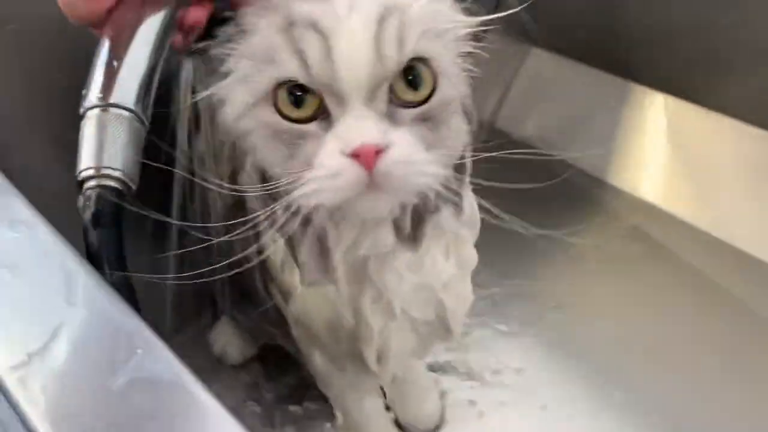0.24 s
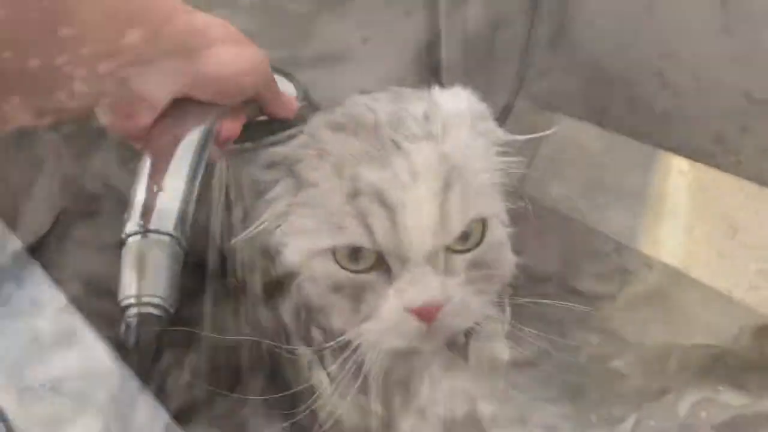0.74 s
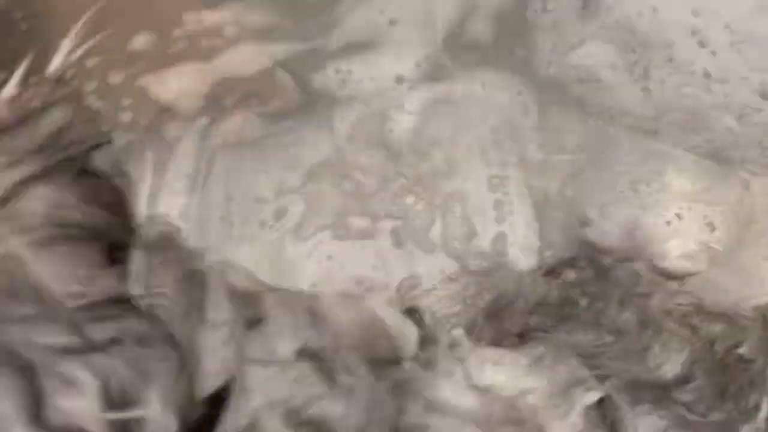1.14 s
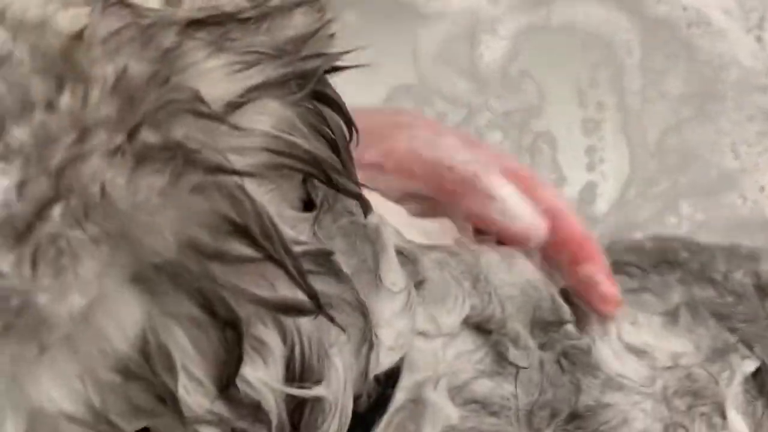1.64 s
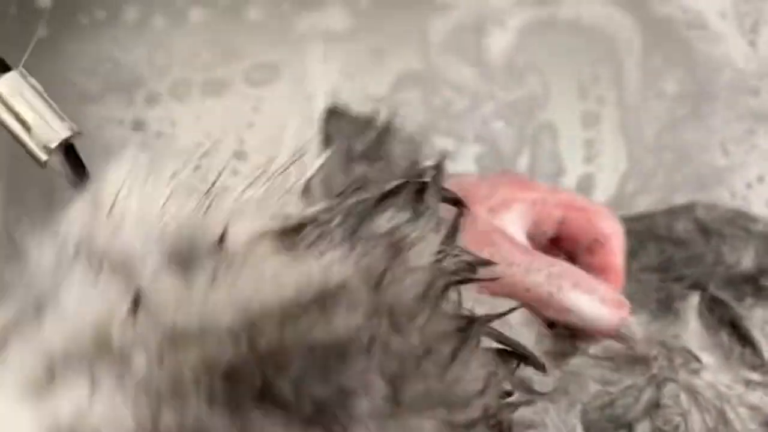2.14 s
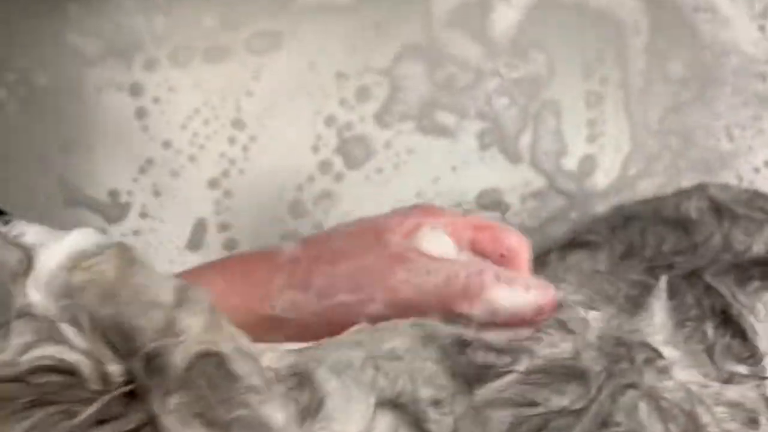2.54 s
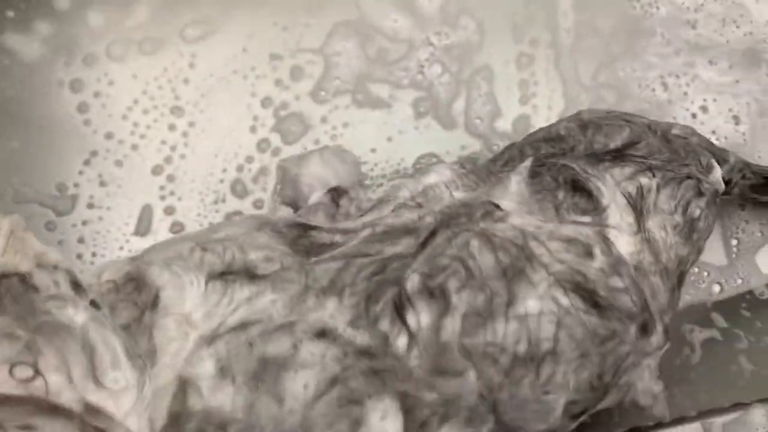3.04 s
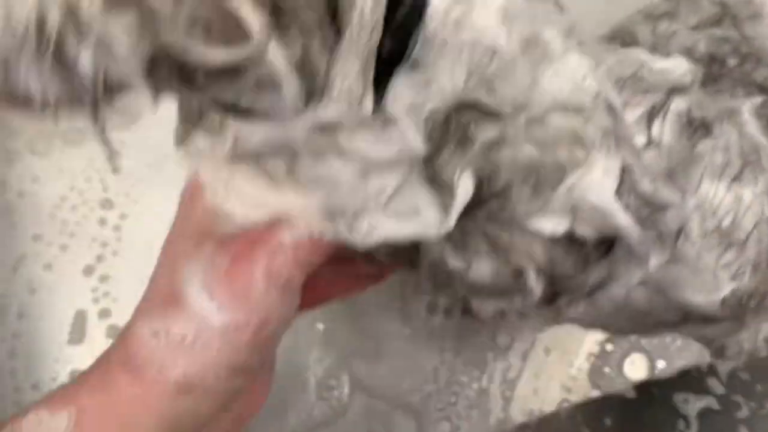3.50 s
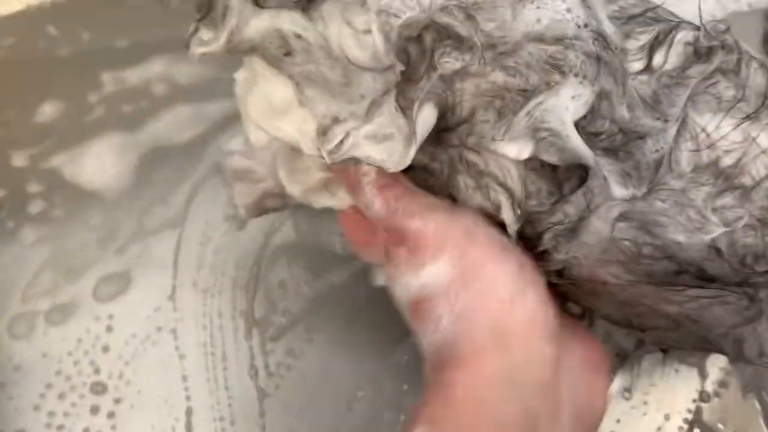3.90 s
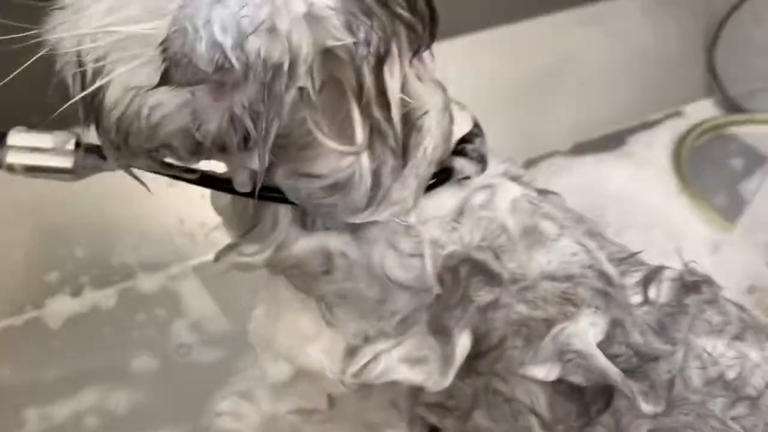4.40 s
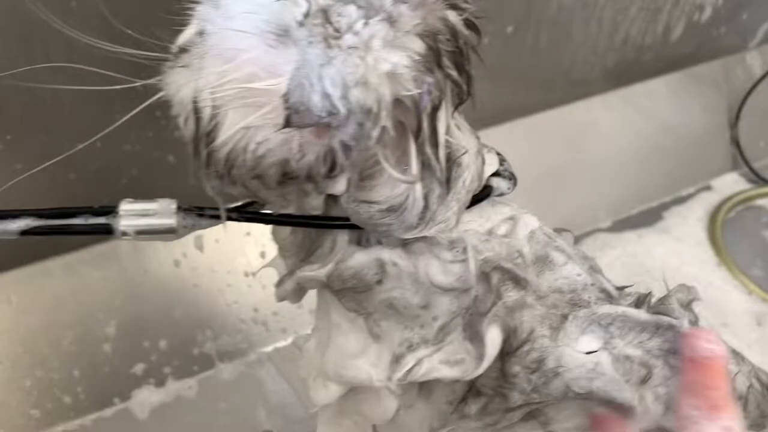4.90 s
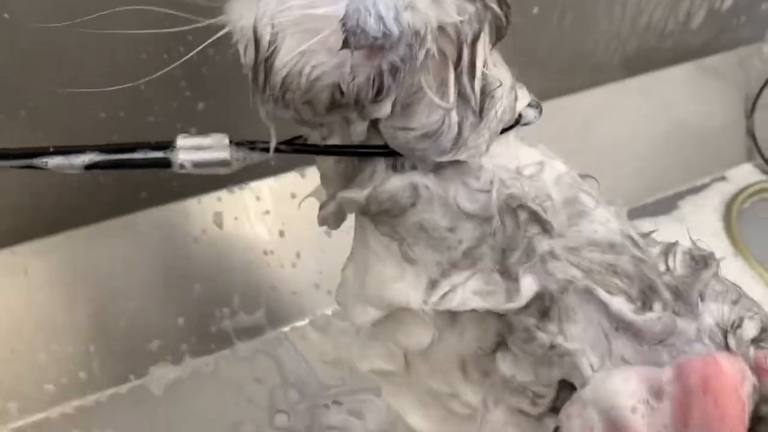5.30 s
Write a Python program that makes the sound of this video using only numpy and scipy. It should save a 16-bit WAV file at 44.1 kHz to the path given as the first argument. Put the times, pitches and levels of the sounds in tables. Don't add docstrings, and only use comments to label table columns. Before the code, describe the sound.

A hand shower sprays wet fur in quick sweeping bursts in a steel tub, then fades into loud, humming blower drone with a few soft thuds.

```python
import sys
import numpy as np
from scipy import signal
from scipy.fft import rfft, irfft, next_fast_len
from scipy.io import wavfile
from scipy.ndimage import uniform_filter1d, map_coordinates

SR = 44100
rng = np.random.default_rng(int(sys.argv[2]) if len(sys.argv) > 2 else 0)


def amplitude_ratio(level_db):
    exponent = np.asarray(level_db, float) / 20
    return 10 ** exponent


def bounce(signal):
    frames = np.transpose(np.atleast_2d(signal))
    limited = np.clip(frames, -1, 1)
    pcm = np.round(limited * 32767).astype(np.int16)
    wavfile.write(sys.argv[1], SR, pcm)


N = 244755
TIME = np.arange(N) / SR
SIDES = np.array([[.5], [-.5]])


def unit(x):
    return x / np.sqrt(np.mean(x ** 2) + 1e-20)


def along(points, hz):
    f, *cols = np.transpose(points)
    return [np.interp(np.log(hz + 1), np.log(f + 1), c) for c in cols]


def curves(rows):
    s, *cols = np.transpose(rows)
    return [np.interp(TIME, s, c) for c in cols]


def wobble(rate):
    steps = np.arange(0, N + 64, 64) / SR
    knots = rng.standard_normal(int(N * rate / SR) + 4)
    return np.interp(TIME, steps, map_coordinates(knots, [steps * rate]))


def swells(rows, rise_db_s, fall_db_s, floor_db):
    s, hold, db = np.transpose(rows)[:, :, None]
    climbing = np.maximum(rise_db_s * (s - TIME), 0)
    sinking = np.maximum(fall_db_s * (TIME - s - hold), 0)
    return np.maximum((db - climbing - sinking).max(axis=0), floor_db)


def filtered(x, response):
    m = next_fast_len(N + SR // 2)
    return irfft(rfft(x, m) * response(np.fft.rfftfreq(m, 1 / SR)), m)[..., :N]


def spectrum_gain(spectrum):
    return lambda f: amplitude_ratio(along(spectrum, f)[0])


def modes(rows, floor_db):
    def gain(f):
        peaks = sum(amplitude_ratio(2 * db) / (1 + (2 * (f - c) / w) ** 4) for c, w, db in rows)
        return np.sqrt(amplitude_ratio(2 * floor_db) + peaks)
    return gain


def band(f, lo_hz, hi_hz):
    return 1 / np.sqrt((1 + (lo_hz / (f + 1)) ** 8) * (1 + (f / hi_hz) ** 4))


def white():
    return rng.standard_normal((2, N))


def patchy(depth_db):
    z = signal.stft(white(), nperseg=512)[2]
    field = uniform_filter1d(rng.standard_normal(z.shape[1:]), size=6, axis=0)
    field = uniform_filter1d(field, size=10, axis=1)
    return signal.istft(z * amplitude_ratio(depth_db * unit(field)), nperseg=512)[1][:, :N]


def drops(rate, spread_db):
    out = np.zeros(2 * N)
    place, sign, size = rng.random((int(2 * rate * N / SR), 3)).T
    out[(place * 2 * N).astype(int)] = (2 * sign - 1) * amplitude_ratio(-spread_db * np.log(size + .01))
    return unit(out.reshape(2, N))


# frequency in Hz, likeness from 0 to 1, left over right in dB, left lead in rad.
PORT_LIKENESS = [(40, .9, 2, .45), (110, .94, 2.5, .55), (190, .98, -1, .9), (225, .9, 0, .6),
                 (255, .6, 2, .8), (300, .88, 4, .9), (350, .95, 4, .55), (560, .8, 3, .7),
                 (800, .25, 4, .5), (1450, .45, 4, -.9), (2100, .25, 3, -.5), (3000, .25, 2, -3),
                 (4200, .25, 4, -5.3), (5500, .3, 2, -7.4)]


def in_room(pair, colour, shift_db=0):
    m = next_fast_len(N + 8192)
    hz = np.fft.rfftfreq(m, 1 / SR)
    alike, pan_db, lead = along(PORT_LIKENESS, hz)
    turn = np.arccos(np.clip(alike, 0, 1)) / 2
    shared, own = rfft(pair, m) * colour(hz)
    tilt = amplitude_ratio((pan_db + shift_db) * SIDES) * np.exp(1j * lead * SIDES)
    mixed = np.cos(turn) * shared + np.sin(turn) * own * 2 * SIDES
    return unit(irfft(tilt * mixed, m)[:, :N])


def direct(pair, spectrum, apart_db):
    lag_s = 1 / 4680
    same = pair[0] + amplitude_ratio(apart_db) * pair[1] * 2 * SIDES
    gain = spectrum_gain(spectrum)
    return unit(filtered(same, lambda hz: gain(hz) * np.exp(-2j * np.pi * hz * lag_s * SIDES)))


# centre in Hz, width in Hz, level in dB.
LOW_ROOM_MODES = [(63.6, 10, -6), (95.6, 28.7, 1), (157.5, 26, -2.5), (185.3, 26.4, 3.5)]
UPPER_ROOM_MODES = [(290.2, 15.5, 2), (317, 63, -4), (376.2, 28, 3), (433, 28.4, 4.5), (470.6, 38, 2),
                    (545, 57, 2.5)]
TOP_ROOM_MODES = [(640, 16, 0), (730, 45, 1)]
# time in seconds, roar in dB, air stream in dB.
FAN_LEVELS = [
    (0, -34, -33),
    (.3, -33.5, -33.5),
    (.8, -38, -38.5),
    (1.35, -31, -38.5),
    (1.85, -31.5, -37),
    (2.15, -28, -37),
    (3, -27, -36),
    (4.2, -27.5, -34.5),
    (5.55, -26.5, -34),
]
SCENE_CHANGE_SPAN = [.75, 1.0]


def roar():
    upper_db, air_db = curves(FAN_LEVELS)
    low_db = -32.5 + .71 * (upper_db + 28) + np.interp(TIME, SCENE_CHANGE_SPAN, [-3, 0])
    top_db = -36.5 + (air_db + 36) + 1.34 * wobble(4.6)
    low_gain, upper_gain = modes(LOW_ROOM_MODES, floor_db=-10.5), modes(UPPER_ROOM_MODES, floor_db=-5.5)
    top_gain = modes(TOP_ROOM_MODES, floor_db=-6)
    low = in_room(white(), lambda f: low_gain(f) * band(f, lo_hz=60, hi_hz=280))
    upper = in_room(white(), lambda f: upper_gain(f) * band(f, lo_hz=289, hi_hz=515))
    top = in_room(white(), lambda f: top_gain(f) * band(f, lo_hz=590, hi_hz=800))
    out = amplitude_ratio(low_db + 2.5 + .64 * wobble(4.8)) * low
    out = out + amplitude_ratio(upper_db + 3 + .78 * wobble(4.08)) * upper
    return out + amplitude_ratio(top_db - .3) * top


# frequency in Hz, density in dB per Hz.
RUSH_SPECTRUM = [(250, -66), (450, -18), (650, 4.5), (850, -10.5), (1000, -14.5), (1300, -4), (2200, -1.5),
                 (2800, -5), (4400, -7), (5600, -13), (7000, -27.5), (8000, -58)]
HISS_SPECTRUM = [(3500, -60), (5000, -10), (6500, -2), (7600, -3), (8200, 0), (11000, -4), (13500, -8),
                 (15700, -12)]
SCATTER_SPECTRUM = [(4500, -60), (6000, -44), (7000, 21), (7600, 14), (8500, -60)]


def air():
    rush_db = curves(FAN_LEVELS)[1]
    hiss_db = -43 + 1.2 * (rush_db + 36.5)
    face_wall_s = 4.22
    away = np.clip((face_wall_s - TIME) / .15 + .5, 0, 1)
    scatter_db = -51 - 11 * away
    gust_db = .3 * wobble(6)
    arrive = np.interp(TIME, [.55, 1.05], [.45, 1])
    rush = in_room(patchy(depth_db=.92), spectrum_gain(RUSH_SPECTRUM))
    spray = patchy(depth_db=1.1) + .25 * drops(rate=2500, spread_db=1.5)
    hiss = direct(spray, HISS_SPECTRUM, apart_db=-20)
    scatter = in_room(white(), spectrum_gain(SCATTER_SPECTRUM))
    roomy = amplitude_ratio(rush_db + 3.5 + gust_db) * rush + amplitude_ratio(scatter_db) * scatter
    return arrive * roomy + np.sqrt(arrive) * amplitude_ratio(hiss_db + 5.5 + gust_db) * hiss


def tone(hz, db, pan_db, lead, flutter_db, start=0):
    turns = np.cumsum(hz + 0 * TIME) / SR + start
    flutter = amplitude_ratio(flutter_db * np.array([wobble(5.77), wobble(5.3)]))
    return np.sqrt(2) * amplitude_ratio(db + pan_db * SIDES) * flutter * np.sin(2 * np.pi * turns + lead * SIDES)


def whistle_db(rows):
    return swells(rows, rise_db_s=300, fall_db_s=300, floor_db=-69)


# time in seconds, blade tone in dB, left over right in dB.
STANDING_WAVE = [(.9, -34, 0), (1.4, -34, -1), (1.65, -30.5, -2), (2.1, -40, -6), (2.4, -30, -4),
                 (2.9, -34.5, -2), (3.2, -29.5, -2), (3.9, -30, -2), (4.4, -32, 0), (4.7, -32, -8),
                 (4.95, -34, 13), (5.55, -32, 6)]
# time in seconds, blade tone in dB, motor whine in dB.
FAR_FAN_LEVELS = [
    (.65, -54, -63),
    (.9, -41, -57),
    (1.65, -31, -53),
    (2.9, -29, -52),
    (3.3, -30, -59),
    (4, -30.5, -60),
    (5.55, -29.5, -62),
]
# start in seconds, length in seconds, level in dB.
NEAR_WHISTLES = [(.22, .1, -51), (.7, .2, -53), (.94, .06, -55), (1.3, .16, -48), (1.46, .67, -55),
                 (2.26, .2, -54), (2.46, .55, -49), (3.14, .31, -48), (3.8, .32, -47), (4.3, .31, -46),
                 (4.62, .68, -54), (5.45, .2, -48)]
DISTANT_WHISTLES = [
    (2.78, .2, -55),
    (4.55, .29, -54),
]


def blowers():
    rinse_hz, near_hz, far_hz = 555.8, 552.7, 538.8
    crossed = np.interp(TIME, SCENE_CHANGE_SPAN, [0, 1])
    late = TIME > 3.6
    early = tone(rinse_hz, -34.5, pan_db=3, lead=.5, flutter_db=.8, start=.15)
    early = early + tone(2 * rinse_hz, -55, pan_db=7, lead=.9, flutter_db=.8)
    near = tone(near_hz, *curves(STANDING_WAVE), lead=.4, flutter_db=1.2, start=.51)
    near_hz = near_hz - .33 * late
    second_db = -45.5 - 14 * np.maximum(TIME - 4.6, 0) + np.interp(TIME, [1, 2.4], [-2, 0])
    near = near + tone(2 * near_hz, second_db, pan_db=7, lead=.9, flutter_db=1.2)
    ninth_hz = 9 * np.where(TIME < .91, rinse_hz, near_hz)
    ninth = tone(ninth_hz, whistle_db(NEAR_WHISTLES) - .5, pan_db=5, lead=.9, flutter_db=2.2)
    far_hz = far_hz + .11 * late
    far_db, whine_db = curves(FAR_FAN_LEVELS)
    far = tone(far_hz, far_db, pan_db=5.5, lead=.8, flutter_db=1.2, start=.5)
    far = far + tone(9 * far_hz, whistle_db(DISTANT_WHISTLES), pan_db=5, lead=.9, flutter_db=2)
    whine = tone(1072 + 1.5 * wobble(1.5), whine_db, pan_db=10.5, lead=1.5, flutter_db=1.5)
    return (1 - crossed) * early + crossed * near + ninth + far + whine


# start in seconds, peak in dB, pitch in Hz, length in cycles.
THUDS = [
    (1.624, -24, 150, 1.8),
    (2.760, -11, 100, 2.1),
    (2.7785, -11, 102, 2.1),
    (2.7985, -19, 145, 4.5),
    (2.851, -19, 95, 1.7),
    (5.005, -13, 78, 1.6),
    (5.03, -21, 58, 2.5),
    (2.885, -22, 105, 4),
]
# start in seconds, peak in dB, ring in Hz.
HARD_TICKS = [
    (1.6110, -36, 11800),
    (1.6114, -22, 8200),
    (1.615, -22, 10100),
]
# time in seconds, rumble in dB.
TUB_SHAKES = [(0, -50), (1.299, -47), (1.64, -36), (1.9, -46), (2.15, -49), (2.83, -31), (2.93, -36),
              (3.32, -49), (3.49, -52), (4.28, -56), (4.53, -54), (5.02, -31), (5.19, -34), (5.32, -37),
              (5.46, -30)]


def bumps():
    out, t = np.zeros(N + SR), np.arange(SR // 2) / SR
    for s, db, hz, cycles in THUDS:
        swell = np.sin(np.pi * np.minimum(t * hz / cycles, 1)) ** 2
        out[round(s * SR):][:len(t)] -= amplitude_ratio(db) * swell * np.sin(2 * np.pi * hz * t)
    for s, db, hz in HARD_TICKS:
        out[round(s * SR):][:len(t)] += amplitude_ratio(db - 60 * t / .0027) * np.sin(2 * np.pi * hz * t)
    shakes = [(s, 0, db) for s, db in TUB_SHAKES]
    shake_db = swells(shakes, rise_db_s=250, fall_db_s=110, floor_db=-63 + 2.5 * wobble(4))
    rumble = in_room(white(), lambda f: band(f, lo_hz=46, hi_hz=72) ** 2)
    return out[:N] * amplitude_ratio(3.5 * SIDES) + amplitude_ratio(shake_db + 4.5) * rumble


# middle in seconds, strength in dB.
JET_SWEEPS = [
    (.05, -0.5),
    (.29, 0.5),
    (.54, -1),
    (.77, -8.5),
]
# centre in Hz, width in Hz, level in dB.
TUB_MODES = [(1290, 150, -2), (1700, 250, -1), (2210, 200, 0), (2800, 200, 0), (3270, 200, -1),
             (4190, 300, -2)]
DRUM_MODES = [(280, 23, 6.5), (363, 16, -3), (455, 30, -9)]
# frequency in Hz, density in dB per Hz.
FUR_SPECTRUM = [(400, -60), (800, -3.5), (1300, 0.5), (2000, 0), (2800, -11), (4500, -60)]
STEEL_SPECTRUM = [(1000, -49), (2000, -4), (2700, 1.5), (3800, -2.5), (5000, -4), (6000, -11.5),
                  (6800, -14.5), (8500, -58)]
FIZZ_SPECTRUM = [(3500, -60), (5000, -13), (6300, -3.5), (8200, 0), (11000, -4.5), (13500, -10),
                 (15700, -13)]


def shower():
    hold_s = .037
    passes = [(s - hold_s / 2, hold_s, db) for s, db in JET_SWEEPS]
    jets_db = swells(passes, rise_db_s=57, fall_db_s=57, floor_db=-30)
    leave = np.interp(TIME, [.8, 1.05], [1, 0])
    tub_gain = modes(TUB_MODES, floor_db=-2.5)
    fur_gain, steel_gain = spectrum_gain(FUR_SPECTRUM), spectrum_gain(STEEL_SPECTRUM)
    on_fur = patchy(depth_db=1.6) + .35 * drops(rate=2000, spread_db=2)
    on_steel = patchy(depth_db=1.9) + .7 * drops(rate=2200, spread_db=3)
    spray = patchy(depth_db=1.2) + .3 * drops(rate=3000, spread_db=1.5)
    fur = in_room(on_fur, lambda f: fur_gain(f) * tub_gain(f), shift_db=.3)
    steel = in_room(on_steel, lambda f: steel_gain(f) * tub_gain(f), shift_db=-2)
    fizz = direct(spray, FIZZ_SPECTRUM, apart_db=-20)
    drum = in_room(white(), modes(DRUM_MODES, floor_db=-60))
    water = amplitude_ratio(-29 + 1.05 * jets_db) * fur + amplitude_ratio(-24 + jets_db) * steel
    water = water + amplitude_ratio(-28.5 + 1.37 * jets_db) * fizz
    return leave * (water + amplitude_ratio(-37) * drum)


def scene():
    return blowers() + roar() + air() + shower() + bumps()


def low_pass(x):
    return signal.sosfilt(signal.butter(12, 15740, fs=SR, output="sos"), x)


def record(dry):
    mix = filtered(dry, lambda hz: (hz < 15750) * 1j * hz / (34 + 1j * hz))
    return low_pass(mix)


dry = scene()
out = record(dry)
bounce(out)
```